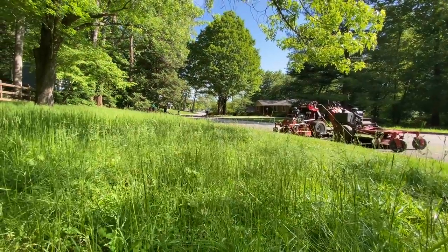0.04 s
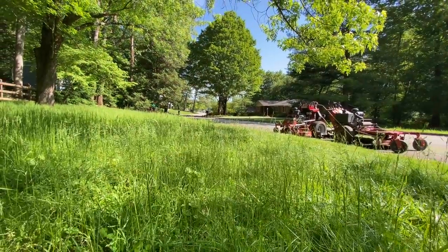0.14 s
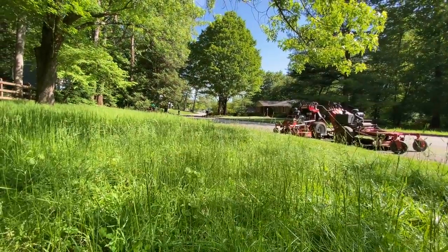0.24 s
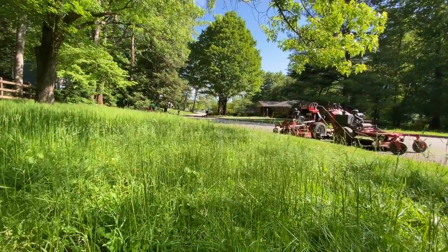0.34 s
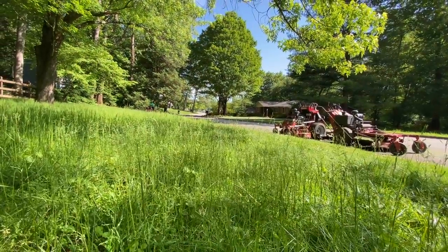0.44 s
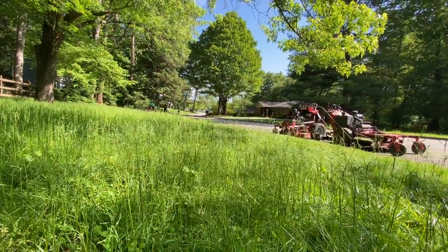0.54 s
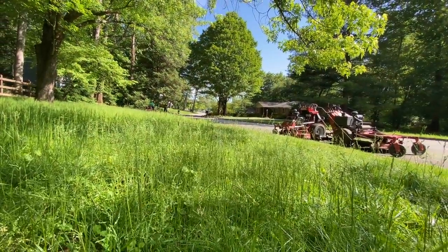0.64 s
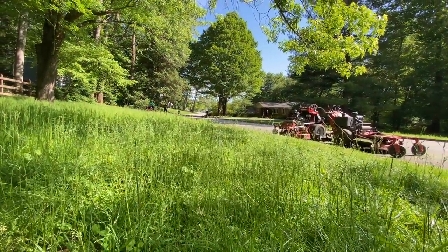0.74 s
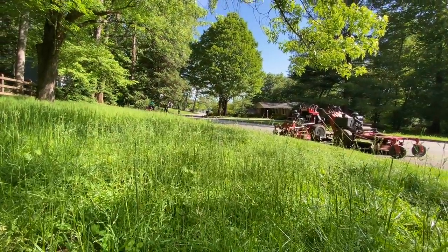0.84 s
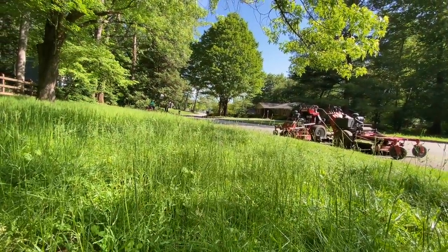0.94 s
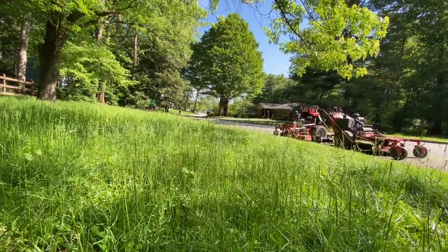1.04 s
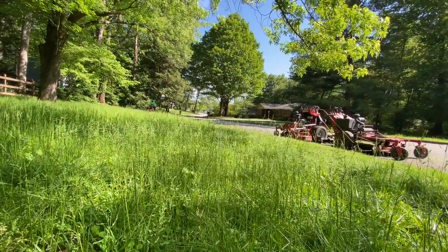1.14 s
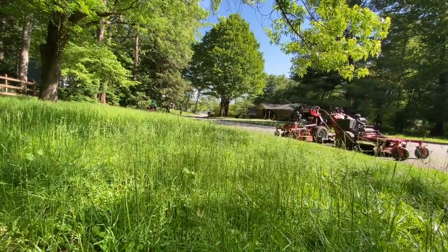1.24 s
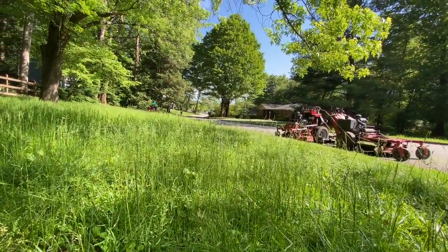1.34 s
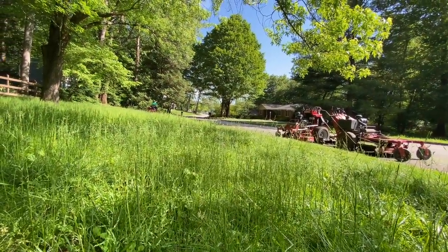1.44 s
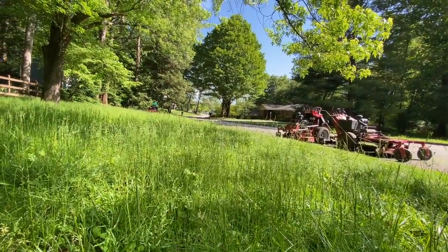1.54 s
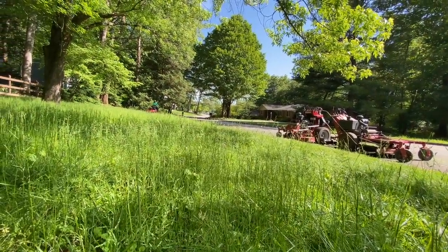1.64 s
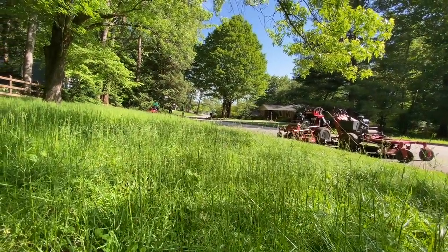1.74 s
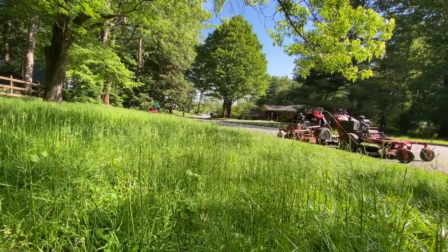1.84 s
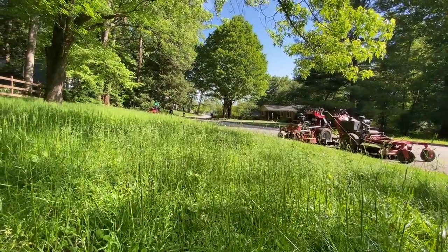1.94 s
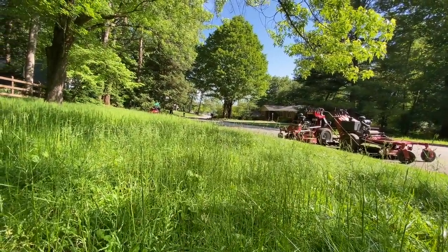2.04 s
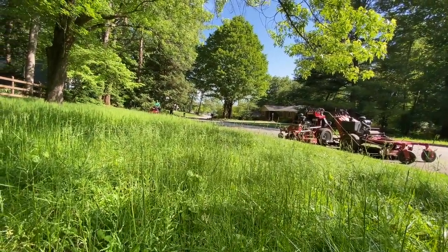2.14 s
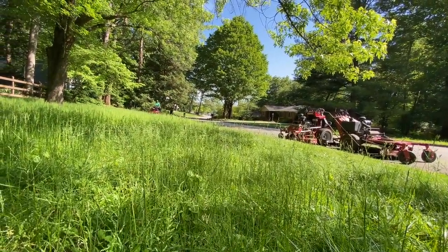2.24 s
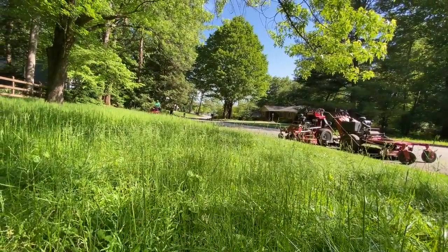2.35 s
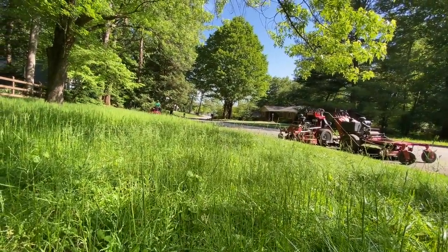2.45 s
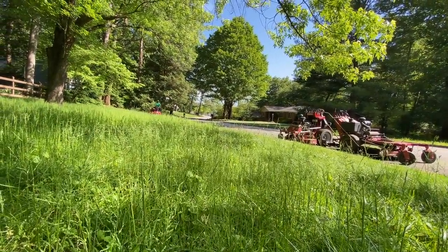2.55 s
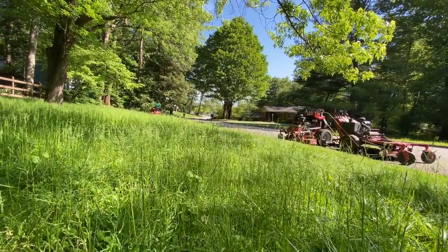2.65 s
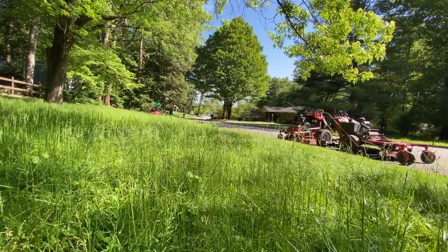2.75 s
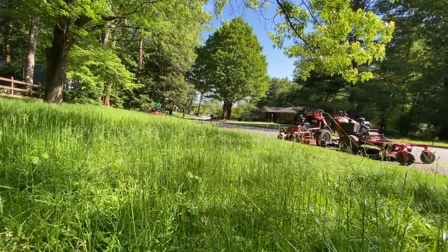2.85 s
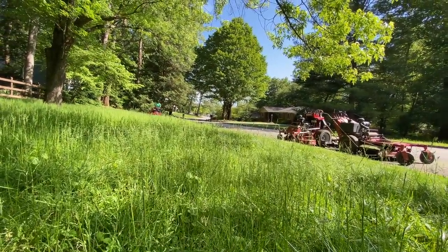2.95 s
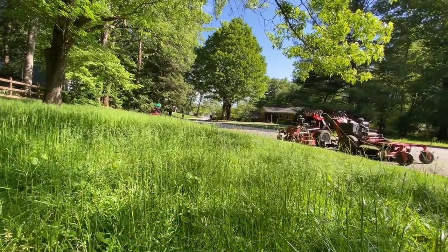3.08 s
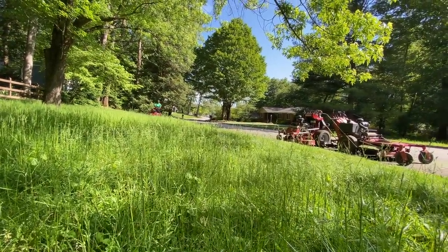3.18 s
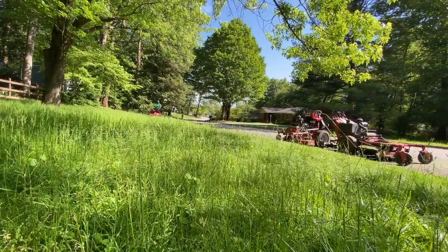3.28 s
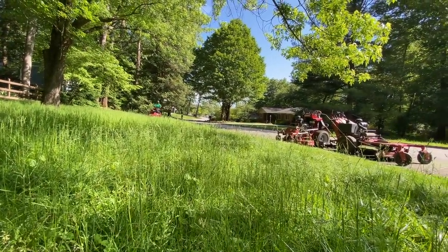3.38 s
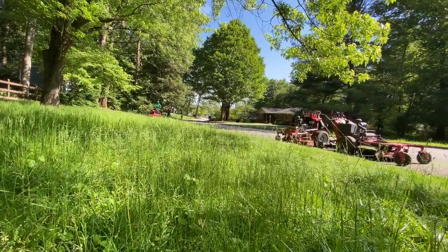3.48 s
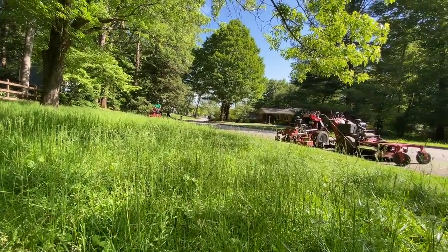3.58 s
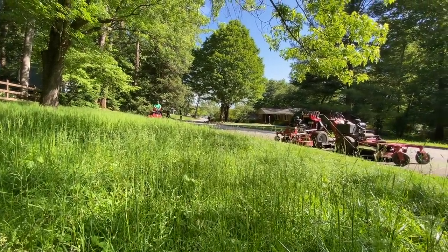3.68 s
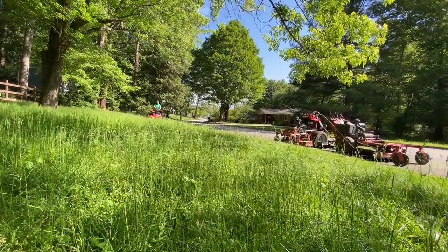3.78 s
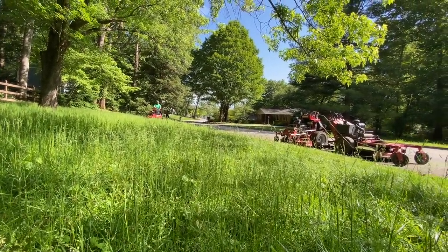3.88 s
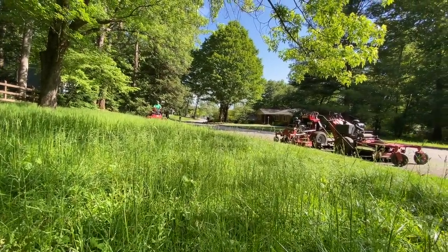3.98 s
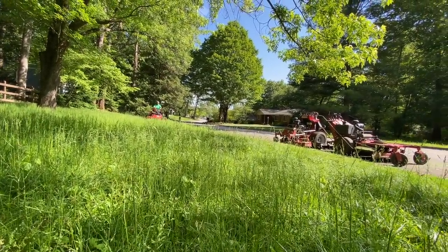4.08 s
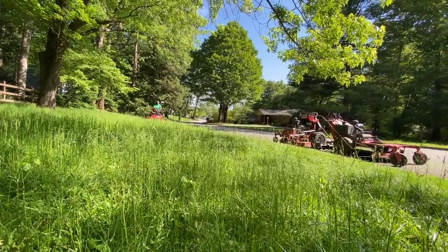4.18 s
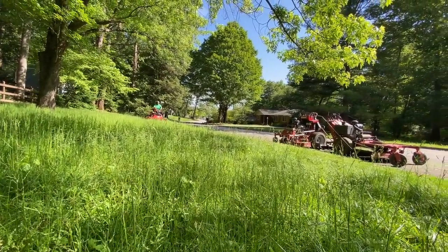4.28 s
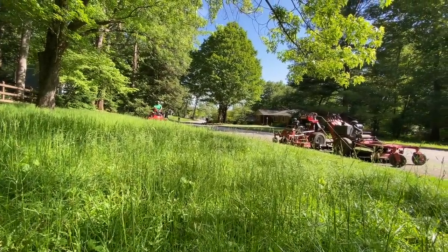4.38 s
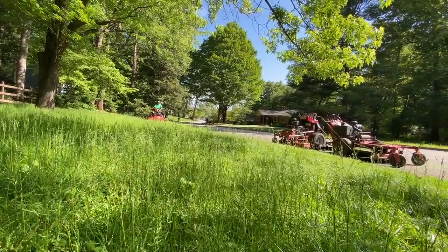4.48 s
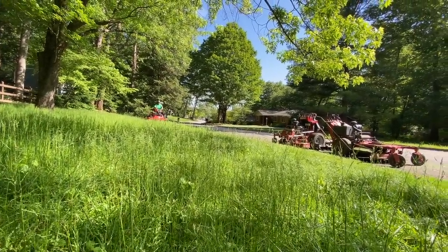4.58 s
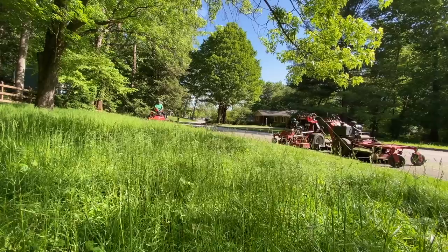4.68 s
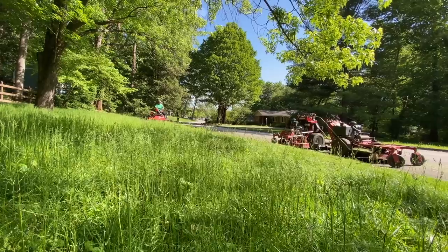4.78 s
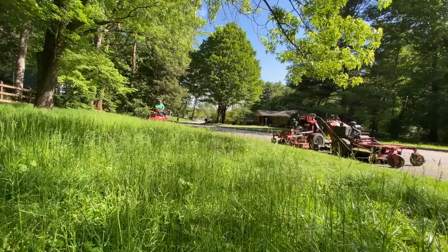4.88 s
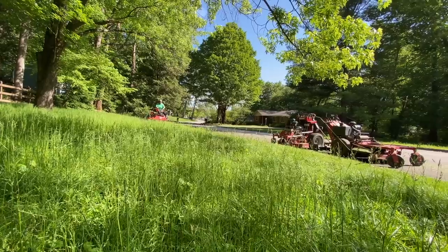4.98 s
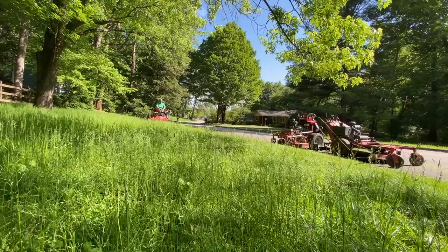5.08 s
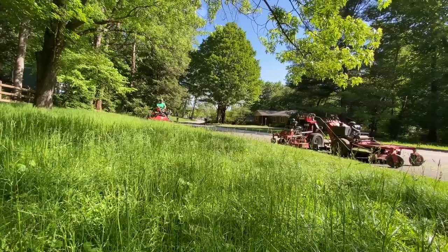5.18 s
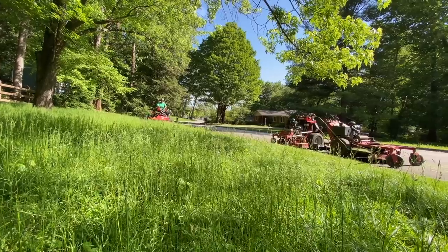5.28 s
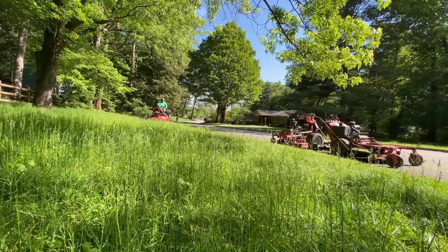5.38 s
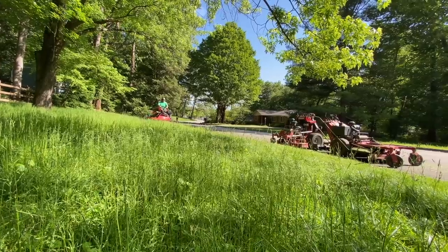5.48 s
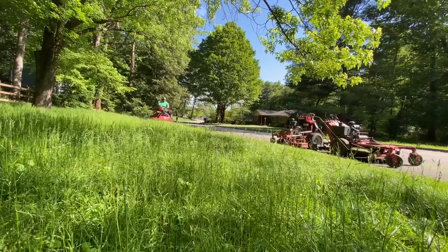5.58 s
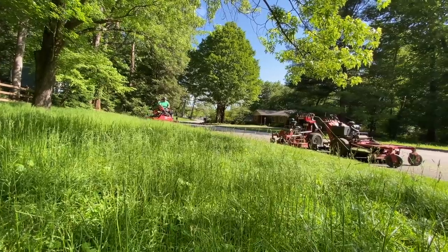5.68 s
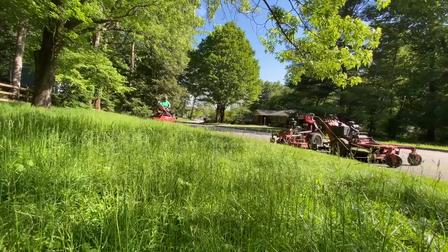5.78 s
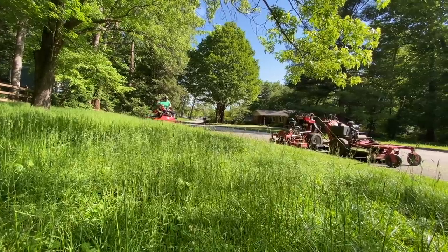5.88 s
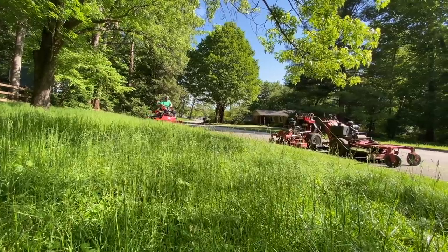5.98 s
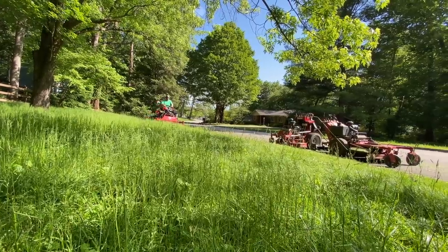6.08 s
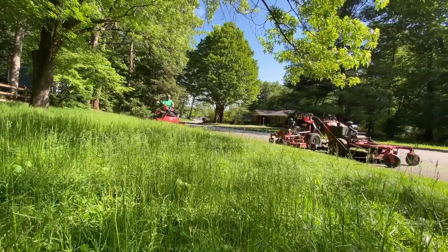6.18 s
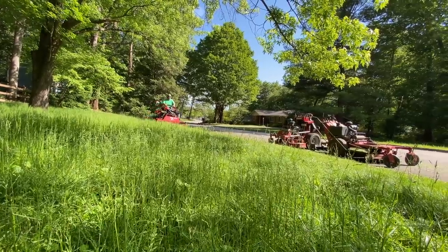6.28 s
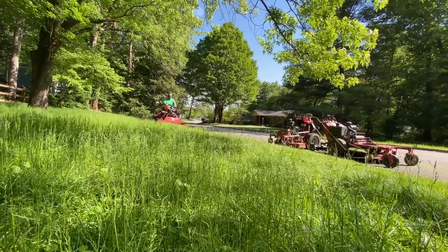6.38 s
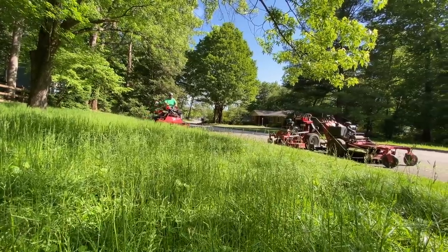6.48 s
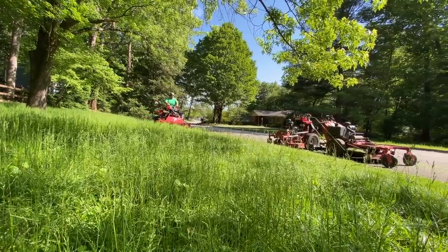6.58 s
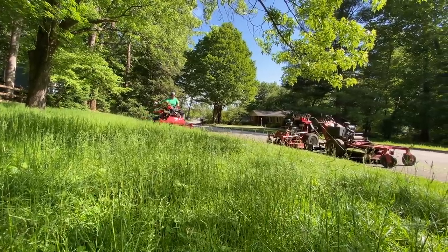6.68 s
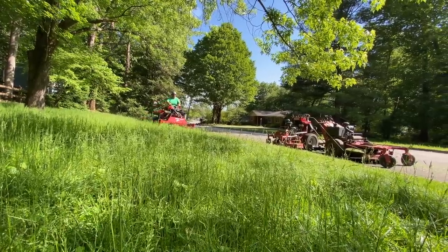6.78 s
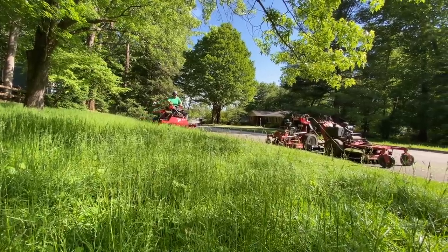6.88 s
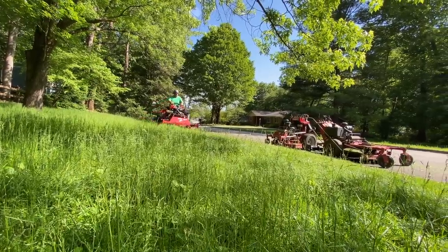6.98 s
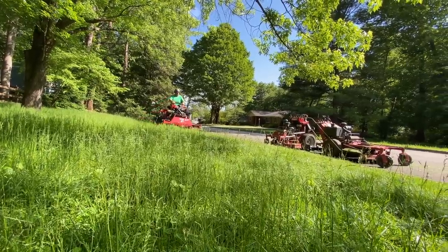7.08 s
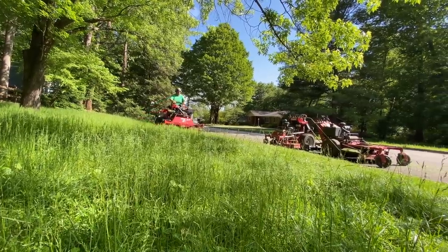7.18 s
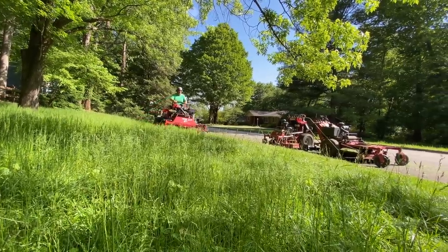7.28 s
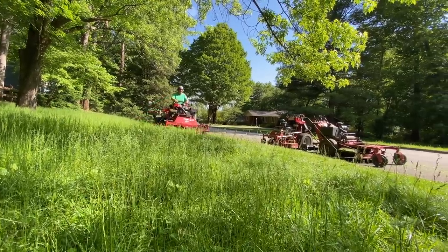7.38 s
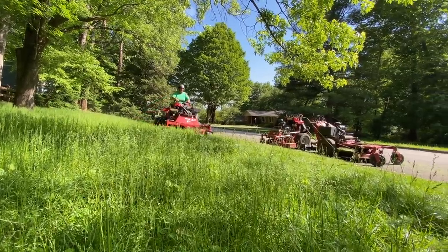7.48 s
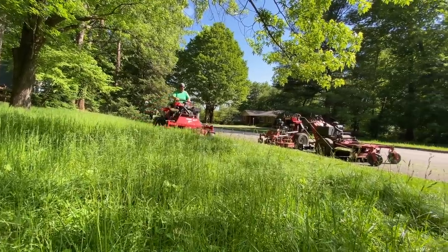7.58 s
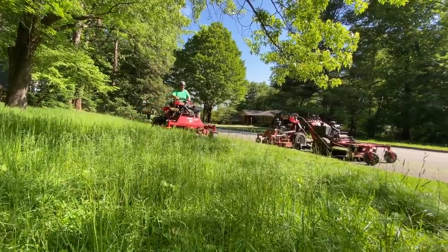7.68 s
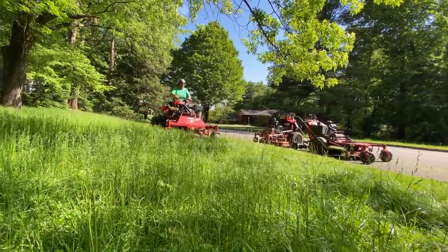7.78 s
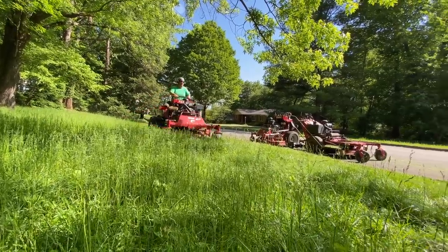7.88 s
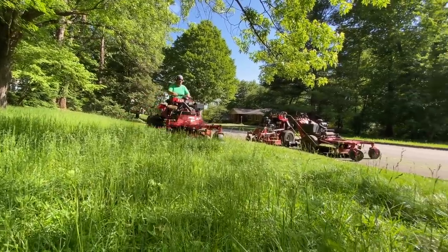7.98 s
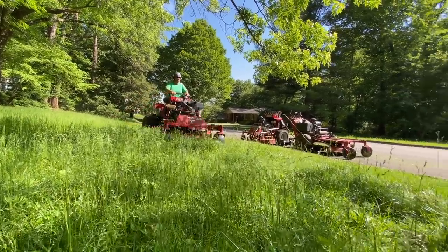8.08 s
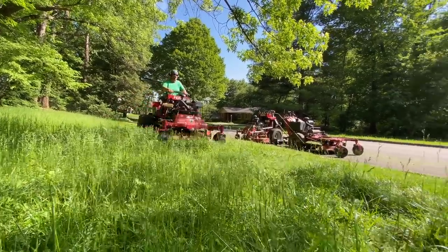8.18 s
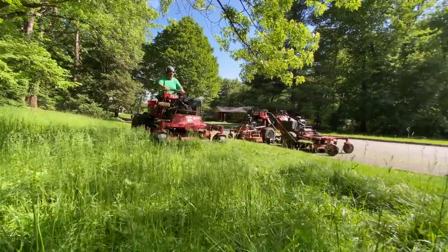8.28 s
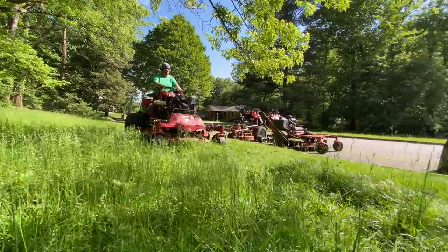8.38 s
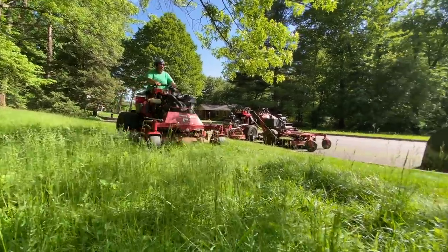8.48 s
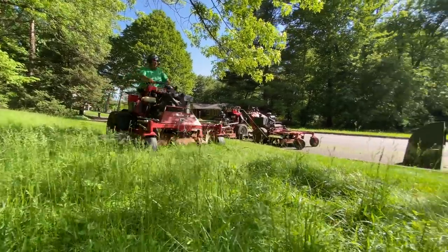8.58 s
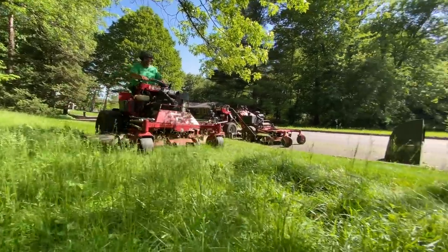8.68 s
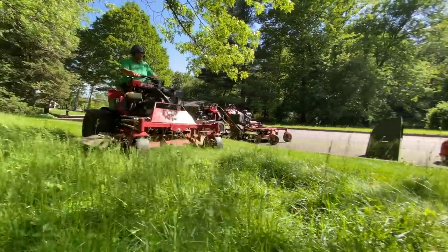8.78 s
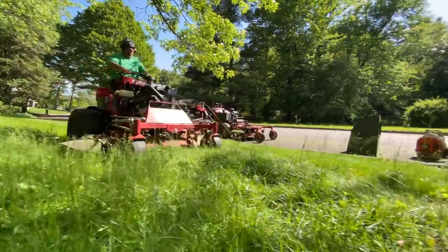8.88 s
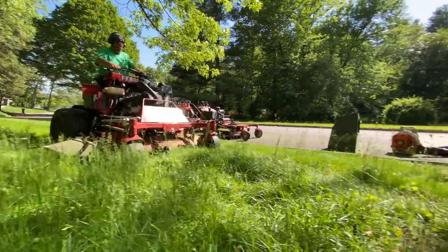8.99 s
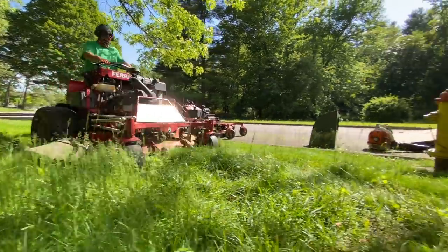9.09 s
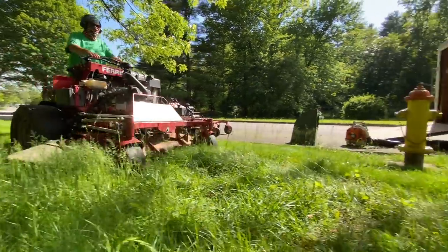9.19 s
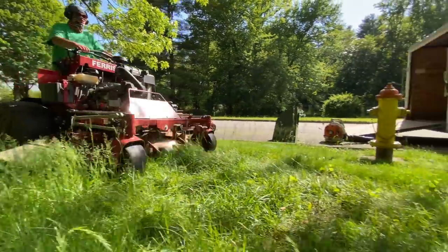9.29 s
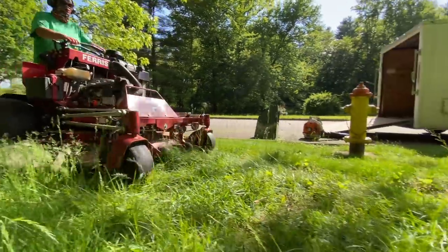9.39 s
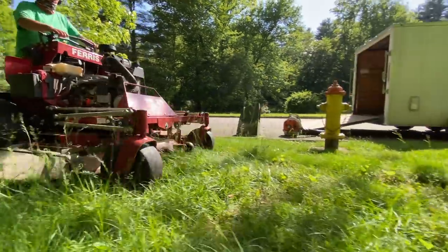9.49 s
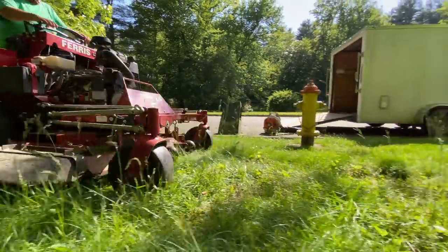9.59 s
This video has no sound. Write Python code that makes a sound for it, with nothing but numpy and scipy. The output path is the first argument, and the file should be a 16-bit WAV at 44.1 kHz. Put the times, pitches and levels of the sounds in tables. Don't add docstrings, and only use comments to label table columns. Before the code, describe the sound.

Steady twin-cylinder engine drone and humming mower blades, first quiet and far off across a lawn, gradually building to a broad, loud roar close to a low stereo microphone. Raspy exhaust and hissing clippings brighten as it nears; occasional dry stalks tick on the metal deck. A thin whine and narrow airy whistle waver within the noise. The engine pitch barely changes and the mower never stops.

```python
import sys
import numpy as np
from scipy import signal
from scipy.fft import rfft, irfft, next_fast_len
from scipy.io import wavfile
from scipy.ndimage import uniform_filter1d

SR = 44100
rng = np.random.default_rng(int(sys.argv[2]) if len(sys.argv) > 2 else 0)


def ratio(d):
    e = np.asarray(d, float) / 20
    return 10 ** e


def store_pcm(level_fs):
    pcm = np.round(np.clip(level_fs, -1, 1) * 32767).astype(np.int16)
    wavfile.write(sys.argv[1], SR, np.atleast_2d(pcm).T)


N = 425124

# start_s, left_port_lead_samples, direct_share (ratio), nearness (0-1)
MOWER_BEARING = [(0, 9.7, 0.64, .0), (3, 8.3, 0.68, 0), (5, 8.04, 0.82, 0.18), (6.5, 7.64, 1, 0.6),
                 (7.5, 8, 1.24, 0.99), (8.5, 8.3, 1.27, 1.), (9.0, 11.7, 0.76, 0.86),
                 (9.64, 16.2, 0.98, 0.71)]


def evened(x):
    return x / np.sqrt(np.mean(abs(x) ** 2) + 1e-20)


def read(points, hz):
    f, value = np.transpose(points)
    return np.interp(np.log(hz + 1), np.log(f + 1), value)


def columns(rows, t):
    s, *values = np.transpose(rows)
    return [np.interp(t, s, v) for v in values]


def drift(t, top_hz, low_hz=0.0988):
    f = np.geomspace(low_hz, top_hz, 24)[:, None]
    coarse = t[::64]
    waves = np.sin(2 * np.pi * (f * coarse + rng.random(f.shape))) / f ** 0.4
    return np.interp(t, coarse, evened(waves.sum(0)))


def swells(rows, t):
    coarse = t[::64]
    bumps = sum(db * np.exp(-abs(2 * (coarse - s) / length) ** 3) for s, length, db in rows)
    return np.interp(t, coarse, bumps)


def partial(turns, level_db):
    return np.sqrt(2) * ratio(level_db) * np.sin(2 * np.pi * (turns + rng.random()))


def faint(turns, orders, level_db, t, fade_db, fade_hz):
    return sum(partial(k * turns, level_db + db + fade_db * drift(t, fade_hz)) for k, db in orders)


def rumble(shape, level_db):
    white = rfft(rng.standard_normal((2, next_fast_len(N))))
    hz = np.linspace(0, SR / 2, white.shape[1])
    return ratio(level_db) * evened(irfft(white * ratio(read(shape, hz)))[:, :N])


def rush(shape, level_db, patchy_db, flicker_db):
    frames, hz = N // 128 + 6, np.fft.rfftfreq(512, 1 / SR)
    a, b, patches = rng.standard_normal((frames, 257, 2, 3)).T
    patches = uniform_filter1d(patches[0], size=6, axis=0)
    patches = evened(uniform_filter1d(patches, size=24, axis=1))
    gusts = evened(uniform_filter1d(rng.standard_normal(frames), size=14))
    colour_db = read(shape, hz)[:, None] + patchy_db * patches + flicker_db * gusts
    noise = signal.istft((a + 1j * b) * ratio(colour_db), nperseg=512, noverlap=384)[1]
    return ratio(level_db) * evened(noise[:, :N])


def exhaust(t, cycles, throb_db, close_db):
    # far_level_db, rise_db per dB of approach, side_on_db
    strong_orders = [(-41, 0.54, -8), (-42.5, 0.59, -5), (-45.5, 0.34, -2), (-44.5, 0.3, -5)]
    # start_s (centre), length_s, level_db
    echoes = [
        [(1, .5, 1), (2.3, 0.72, 4.5), (2.9, .5, -5), (7.3, 0.79, 3)],
        [(.3, .5, -3), (3.6, 0.36, 2), (5.4, .4, -3), (7.5, 0.45, -5)],
        [(.8, .4, 2), (1.2, .25, -2.5), (2.1, 1.8, 4.5), (5.8, .6, 3.5)],
        [(.6, 0.51, 0.5), (5.1, 0.34, 3), (7.2, 0.47, 0), (8.3, .7, 3)],
    ]
    abeam = np.clip((columns(MOWER_BEARING, t)[0] - 8) / 6, 0, 1)
    out = partial(2 * cycles, throb_db)
    for k, (db, rise, side_db), rows in zip((3, 5, 6, 8), strong_orders, echoes):
        order_db = db + rise * close_db + side_db * abeam + swells(rows, t)
        out += partial(k * cycles, order_db + 1.05 * drift(t, 3.3, 1.2))
    return out


def exhaust_puffs(cycles):
    puffs = np.exp(-(cycles % 1) / 0.16) + .5 * np.exp(-((cycles - .375) % 1) / 0.083)
    return evened(puffs - puffs.mean())


def blades(t, passes, close_db):
    # far_level_db, rise_db per dB of approach
    blade_hum = [(-34.5, 0.6669), (-49.5, 1.5), (-40.5, 0.7526), (-43.5, 0.507), (-48.5, 1.0663),
                 (-58, 1.3736)]
    # start_s (centre), length_s, level_db
    slips = [
        [(.95, .5, 3), (2.2, 0.69, -6), (3.55, .35, -3.5), (4.1, 0.56, 2.5), (5.25, 0.51, 3.5), (6.1, 0.48, 3),
         (9.64, .7, -3)],
        [(1.2, 0.89, 3), (1.8, 0.27, -12), (2.7, 0.39, 9), (4, 0.99, 4), (5.4, 1.46, -5.5), (9, 2.6, 3.5)],
        [(2.3, 1.6, 3.5), (3.45, 0.19, 9.5), (3.7, 1.75, -6), (4.8, 0.29, -2), (8.4, 1.4, 2)],
        [(1.9, 0.65, -11), (5.15, .45, -10), (6.25, 1.45, 9), (9.1, 2.9, -2.5)],
        [(.6, .6, -8), (2.7, 0.62, 8), (4.3, 1, 3.5), (5.6, 0.46, 8.5), (7.1, 0.56, 4), (8.2, 0.41, 3)],
        [(2.3, .9, 8.5), (4.4, 0.74, 5.5), (7.75, .5, 7.5)],
    ]
    out = np.zeros(N)
    for k, ((db, rise), rows) in enumerate(zip(blade_hum, slips)):
        waver = .035 * (k + 1) * drift(t, 3, .4)
        flutter_db = (.5 + .25 * k) * drift(t, 9, 3)
        out += partial((k + 1) * passes + waver, db + rise * close_db + swells(rows, t) + flutter_db)
    return out


def weak_orders(t, cycles, passes, roar_db):
    # multiple (of cycle rate), level_db
    cycle_orders = [(1, -24), (4, -14), (7, -12), (10, -12), (11, -12), (12, -17), (13, -12), (16, -10),
                    (19, -13), (20, -14), (23, -15), (24, -16), (32, -22), (36, -25)]
    # multiple (of blade-pass rate), level_db
    blade_orders = [(1.5, -10), (7, -17), (8, -20), (9, -22)]
    near_db = 0.59 * uniform_filter1d(roar_db, size=40000) - 15.0
    out = faint(cycles, cycle_orders, near_db, t, fade_db=2.0, fade_hz=3.5)
    return out + faint(passes, blade_orders, near_db, t, fade_db=4.0, fade_hz=4.5)


def deck_roar(roar_db):
    # pitch_hz, level_db (per Hz)
    roar = [(25, -15), (40, -42), (70, -0.5), (125, -0.5), (250, 0.5), (420, 0.5), (600, -3.5), (800, -17),
            (1200, -33.5)]
    # pitch_hz, level_db (per Hz)
    body = [(300, -14.5), (550, -1.5), (700, 0.5), (900, -1), (1200, -9.5), (1500, -8), (2200, -31)]
    low_db = .6 * uniform_filter1d(roar_db, size=20000) - 11.
    return rumble(roar, low_db) + rumble(body, roar_db - 1.5)


def exhaust_rasp(t, rasp_db, puffs):
    # pitch_hz, level_db (per Hz)
    rasp = [(600, -31), (1100, -2.5), (1500, -1), (2100, 0), (2800, -3.5), (3500, -5), (4200, -13),
            (6000, -26.5)]
    # start_s (centre), length_s, level_db
    pipe_faces = [
        (7.6, 1.4, 1),
    ]
    level_db = rasp_db + 0.65 + swells(pipe_faces, t)
    return rush(rasp, level_db, patchy_db=0.54, flicker_db=0.8) * (1 + 0.054 * puffs)


def engine_hiss(hiss_db, puffs):
    # pitch_hz, level_db (per Hz)
    hiss = [(2500, -20), (3500, -5), (4300, 1), (4800, -1.5), (5600, 0.5), (6400, 0), (7200, -7),
            (9000, -17)]
    return rush(hiss, hiss_db - .5, patchy_db=0.7, flicker_db=0.64) * (1 + 0.1 * puffs)


def grass_spray(spray_db, puffs):
    # pitch_hz, level_db (per Hz)
    spray = [(4000, -23), (7000, 0.5), (8500, -0.5), (9500, 1.5), (10300, 1.5), (11500, -11), (13000, -8),
             (15700, -10.5)]
    return rush(spray, spray_db + 0.5, patchy_db=0.0, flicker_db=1.0) * (1 + 0.14 * puffs)


def pulley(t, cycles, close_db):
    # start_s (centre), length_s, level_db
    moans = [
        (.1, .3, 0),
        (2.4, .4, 0),
        (3.6, 1, 9),
        (5.4, .5, 7),
        (6.1, .5, 0),
        (9, .5, 2),
    ]
    return partial(15.27 * cycles + 0.1 * drift(t, 6), -53 + 0.84 * close_db + swells(moans, t))


def pump(t, cycles, close_db):
    # start_s (centre), length_s, level_db
    surges = [
        (2.75, .5, 12),
        (3.6, .5, 10),
        (4.5, 1.3, 7),
        (6.7, 1.2, 5),
        (8.4, .6, 4),
    ]
    return partial(40 * cycles, -65 + .7 * close_db + swells(surges, t))


def fin_whistle(t, close_db):
    # start_s (centre), length_s, level_db
    gusts = [
        (.65, .45, 5.5),
        (4.4, 1.2, 3),
        (6.2, .7, 6),
        (7.1, .7, 4),
        (8.8, .35, 6),
        (9.23, .32, 10),
    ]
    whistle_hz, band_hz = 4210, 16
    r = np.exp(-np.pi * band_hz / SR)
    wobble = signal.lfilter([1], [1, -r], rng.standard_normal((2, N)))
    tone = ((wobble[0] + 1j * wobble[1]) * np.exp(2j * np.pi * whistle_hz * t)).real
    return ratio(-69 + .9 * close_db + swells(gusts, t)) * evened(tone)


def stalk_snaps():
    # start_s, level_db (peak)
    hits = [(2.637, -36), (3.784, -35), (4.197, -36), (4.382, -35), (4.781, -28), (5.453, -32),
            (5.959, -32), (6.107, -27), (6.562, -30), (6.817, -30), (7.18, -30), (8.687, -23), (8.828, -23),
            (9.388, -25)]
    out, t = np.zeros(N), np.arange(600) / SR
    decay_db = -60 * t / .016
    for (s, db), (low, high) in zip(hits, rng.uniform(.9, 1.1, (len(hits), 2))):
        ring = np.sin(2 * np.pi * 2450 * low * t) + .5 * np.sin(2 * np.pi * 3300 * high * t)
        tick = ring + .6 * rng.standard_normal(len(t))
        out[round(s * SR):][:len(t)] += ratio(db + 1 + decay_db) * tick
    return np.array([out, np.roll(out, 8)])


def air_at_ports(direct, diffuse):
    # pitch_hz, width_hz, far_db, close_db
    shell = [(960, 150, -3, 0), (1433, 110, -4.5, -6), (1600, 200, -2.5, 2.5), (1905, 100, -1.5, 6.5),
             (2300, 55, -10, -3.5), (2420, 180, 0, 1.5), (3370, 190, 1, 3.5), (4520, 180, -1.5, -1.5),
             (4675, 190, 6.5, 5), (4870, 120, 7.5, -3), (5550, 230, -0.5, 1.5)]
    # pitch_hz, width_hz, level_db
    side_on = [(1020, 270, 6.5), (1390, 330, 5), (2300, 1200, 0), (7660, 1500, -3.5)]
    # pitch_hz, likeness (0-1)
    likeness = [(60, 1.0), (300, 0.52), (700, 1), (1200, 0.46), (1900, 0.78), (2600, 0.67), (3400, 0.68),
                (4800, 0.5), (6300, 0.24), (7500, 0.096), (16000, 0.18)]
    # pitch_hz, far_phase_rad, close_phase_rad
    port_skew = [(60, 0.48, -0.2), (500, 0.45, 0.032), (1200, 1, -0.18), (2300, -0.41, -1.37),
                 (3520, -0.52, -0.82), (4330, 1, -0.76), (5130, 0.65, -1.75), (6050, -.3, -1),
                 (7000, -1.5, 1.5), (16000, 0, 0)]
    # pitch_hz, left_minus_right_db
    balance = [(60, -1), (250, -0.5), (500, 9), (800, 5.5), (1300, 5), (2200, -1), (3100, 2.5), (4400, -1),
               (5500, 2.5), (7000, -0.5), (8200, 3), (9300, -1.5), (11000, -1)]
    hz, t, z = signal.stft(np.array([direct, diffuse]), SR, nperseg=1024)
    hz = hz[:, None]
    lead, share, near = columns(MOWER_BEARING, t)
    abeam = np.clip((lead - 8) / 4, 0, 1)
    for f, width_hz, far_db, close_db in shell:
        z *= ratio((far_db + (close_db - far_db) * near) * np.exp(-(2 * (hz - f) / width_hz) ** 2))
    for f, width_hz, db in side_on:
        z *= ratio(db * abeam * np.exp(-(2 * (hz - f) / width_hz) ** 2))
    z *= ratio(-3. * (1 - near) * (hz / 13000) ** 4)
    same = np.clip(read(likeness, hz) ** (1 / share ** 2), 0, 1)
    f, far_skew, close_skew = np.transpose(port_skew)
    skew = (1 - near) * np.interp(hz, f, far_skew) + near * np.interp(hz, f, close_skew)
    turn = np.exp(-1j * (2 * np.pi * hz * lead / SR + skew))
    tilt = ratio(read(balance, hz) / 2)
    left = z[0] * tilt
    right = (same * z[0] * turn + np.sqrt(1 - same ** 2) * z[1]) / tilt
    return signal.istft(np.array([left, right]), SR, nperseg=1024)[1][:, :N]


def tones_at_ports(x):
    at = np.arange(N)
    lead, _, near = columns(MOWER_BEARING, at / SR)
    right = np.interp(at - lead - 7.1 * (1 - near) + 2.6, at, x)
    return np.array([x * ratio(0.82), right * ratio(-0.05)])


def scene():
    # start_s, cycle_rate_hz, throb_db
    engine = [(0.0, 27.74, -40.9), (0.4, 27.28, -41), (1.0, 27.3, -40.1), (1.41, 27.34, -38),
              (2.21, 27.33, -46), (2.61, 27.56, -37), (3.01, 27.53, -39.5), (3.41, 27.43, -38),
              (4.02, 27.6, -38), (4.22, 27.51, -40), (5.02, 27.4, -34.5), (5.42, 27.74, -33.5),
              (6.02, 27.31, -33.7), (7.03, 27.53, -31), (7.83, 27.75, -31), (8.23, 27.43, -29.8),
              (8.84, 27.73, -30.5), (9.64, 27.7, -31.6)]
    # start_s, closing_gain_db, grass_bite_db
    approach = [(0, 0.5, -2), (.3, 0, -0.5), (.6, 1.5, -1.5), (1.3, 1.5, -1), (1.6, 2, 0), (2.2, 2.5, 0.5),
                (3, 3, 0), (3.5, 4, 1), (4.2, 5, 0), (5.4, 6, 2), (6.3, 8.5, 0), (6.8, 9.5, 0),
                (7.5, 11, 1), (8.3, 13, -.5), (8.75, 14.5, 0.5), (9, 12.5, 0), (9.4, 13.5, 0),
                (9.64, 13.5, 0.5)]
    t = np.arange(N) / SR
    cycle_hz, throb_db = columns(engine, t)
    close_db, bite_db = columns(approach, t)
    roar_db = -48 + 1.332 * close_db + 1.3 * bite_db
    rasp_db = -48 + close_db + 0.086 * bite_db
    hiss_db = -49 + 1.11 * close_db + 0.12 * bite_db
    spray_db = -56.5 + 1.11 * close_db + 0.67 * bite_db
    cycles = np.cumsum(cycle_hz) / SR
    passes = 3.544 * cycles
    puffs = exhaust_puffs(cycles)

    tones = exhaust(t, cycles, throb_db, close_db) + blades(t, passes, close_db)
    tones += weak_orders(t, cycles, passes, roar_db)
    tones += pulley(t, cycles, close_db) + pump(t, cycles, close_db)

    air = deck_roar(roar_db) + exhaust_rasp(t, rasp_db, puffs)
    air += engine_hiss(hiss_db, puffs) + grass_spray(spray_db, puffs)
    return tones_at_ports(tones) + air_at_ports(*air) + stalk_snaps() + fin_whistle(t, close_db)


def treble_gaps(x):
    # low_hz, high_hz
    mid_gaps = [(11330, 12720), (15100, 23000)]
    # low_hz, high_hz
    side_gaps = [(9780, 10400), (13120, 15050), (15750, 23000)]
    hz, t, z = signal.stft(np.array([x[0] + x[1], x[0] - x[1]]) / 2, SR, nperseg=2048)
    hz = hz[:, None]
    for part, gaps in zip(z, (mid_gaps, side_gaps)):
        for lo, hi in gaps:
            ragged = min(.12 * (hi - lo), 170) * rng.standard_normal((2, len(t))).clip(-1.5, 1.5)
            ragged *= np.array([[lo < 15000], [1]])
            part *= (hz < lo + ragged[0]) | (hz > hi + ragged[1])
    z[1] *= (abs(hz - 8880) > 190) | (rng.random(len(t)) > .6)
    mid, side = signal.istft(z, SR, nperseg=2048)[1][:, :N]
    return np.array([mid + side, mid - side])


def roll_off(x):
    return signal.sosfilt(signal.butter(12, 15980, fs=SR, output="sos"), x)


def record(dry):
    rounded = .6 * np.tanh(dry / .6)
    mix = treble_gaps(rounded)
    return roll_off(mix)


dry = scene()
out = record(dry)
store_pcm(out)
```